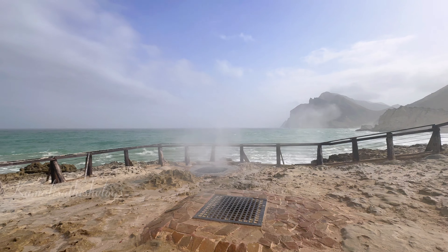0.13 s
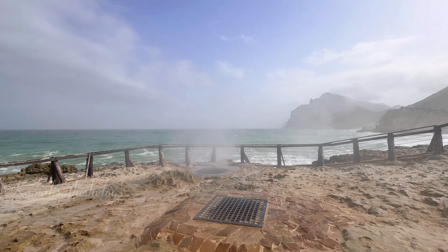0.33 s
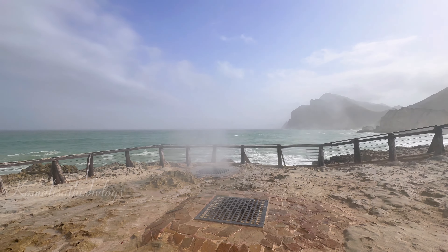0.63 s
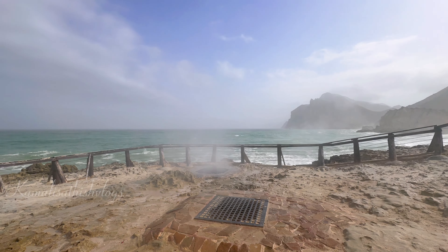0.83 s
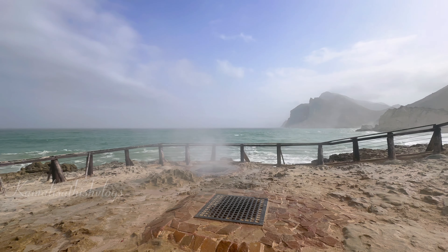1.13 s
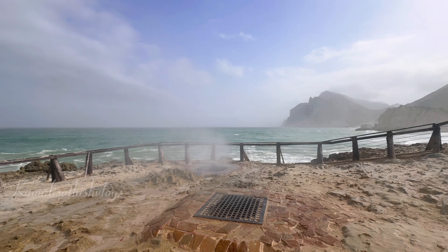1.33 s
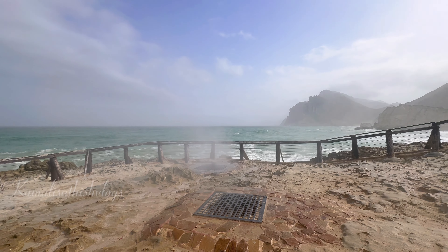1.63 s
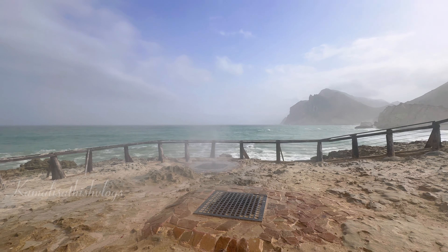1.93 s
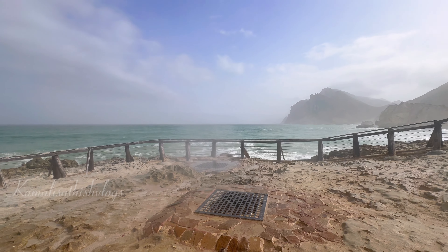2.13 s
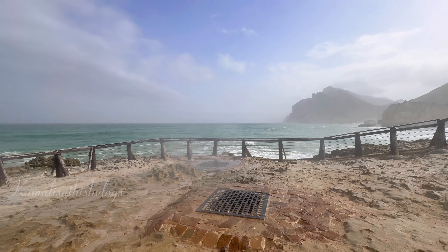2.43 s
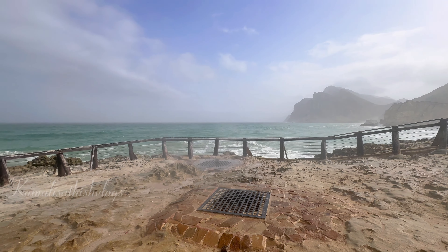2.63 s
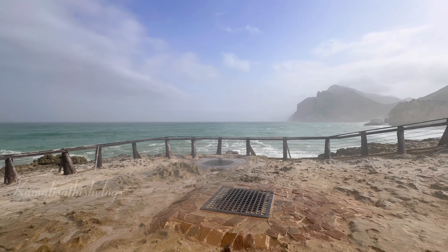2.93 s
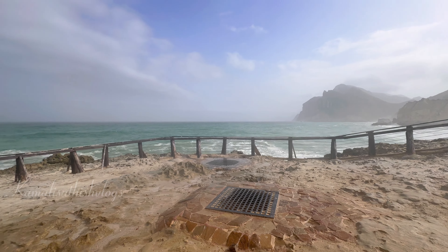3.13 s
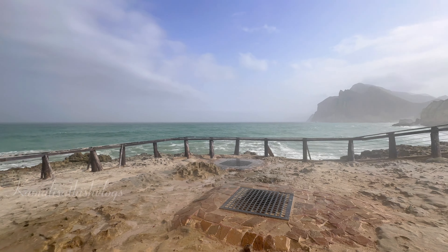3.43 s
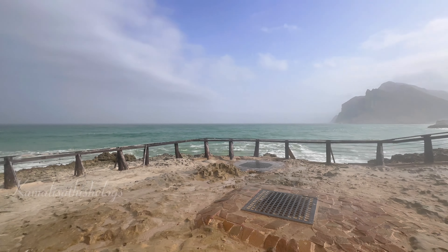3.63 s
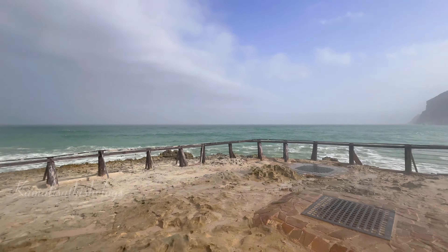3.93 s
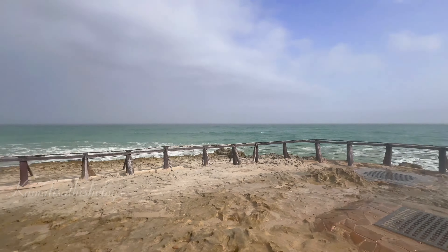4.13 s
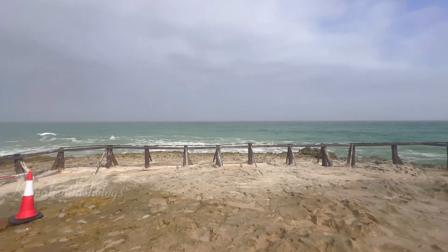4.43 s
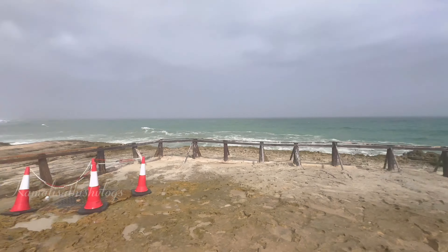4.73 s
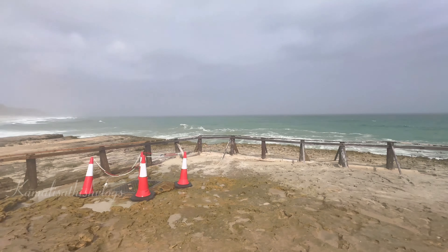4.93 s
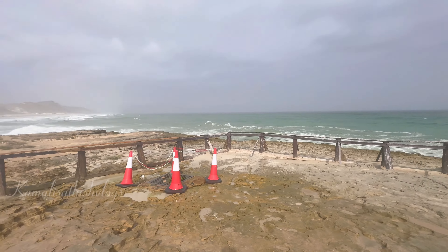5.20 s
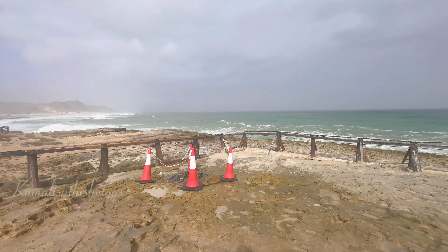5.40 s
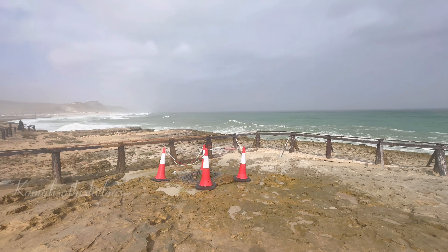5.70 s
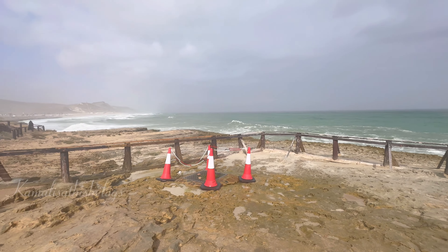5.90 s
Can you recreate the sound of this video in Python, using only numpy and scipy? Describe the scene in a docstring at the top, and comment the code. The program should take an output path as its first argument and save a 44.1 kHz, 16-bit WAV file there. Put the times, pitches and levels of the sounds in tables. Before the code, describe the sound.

Outdoors by a rocky shore, close to a blowhole: a short puff, a brief choked lull, then a roaring, howling blast of air and spray lasting over a second and slightly overloading the microphone. It collapses into a hard watery gulp and uneven hollow puffs, each weaker, while water runs off and surf washes softly with a thin drifting hiss.

```python
"""A swell runs into a sea cave and drives air and spray up through a blowhole in the rock shelf.
The cave roars, the shaft howls and the jet hisses in one long blast that just overloads the microphone.
Weaker, gulping puffs follow as surf washes along the shore, with a narrow, drifting hiss near 6 kHz.
Air, spray and water are filtered noise under level curves; brief narrow noise bands colour them
and the gulps add decaying sines."""
import sys
import numpy as np
from scipy.fft import rfft, irfft, next_fast_len
from scipy.io import wavfile
from scipy.ndimage import uniform_filter1d, map_coordinates

SR = 44100
rng = np.random.default_rng(int(sys.argv[2]) if len(sys.argv) > 2 else 0)


def unload_audio(sound):
    """Save the sound as a 16-bit wav file, at the path given as the first command line argument."""
    columns = np.transpose(np.atleast_2d(sound))
    # keep every value between -1 and 1, then stretch to whole-number steps
    steps = np.round(np.clip(columns, -1, 1) * 32767)
    wavfile.write(sys.argv[1], SR, steps.astype(np.int16))


N = 267201

# Surges of water that push air through the cave. Each row: start of full push [s], hold [s],
# then roar, howl and rumble levels [dB] at that start, before drift and flutter.
SURGE_ROWS = [(0.019, 0.1, -12.5, -20.5, -22), (0.174, .19, -19, -52, -31), (.46, 0.042, -13, -24.5, -30),
              (0.564, 1.138, -9.7, -17.5, -21.5), (1.781, 0.028, -13.5, -24, -44),
              (2.21, 0.04, -18.5, -31.5, -51), (2.362, 0.022, -14, -27, -36), (2.452, 0.076, -12, -21, -49),
              (2.609, 0.039, -12, -24, -52), (2.734, 0.022, -18, -27.5, -53), (2.802, 0.055, -15, -23, -39),
              (2.935, 0.045, -27, -28, -54), (3.049, 0.017, -14, -27, -41), (3.15, 0.038, -19, -29, -53),
              (3.28, 0.065, -28, -35, -59), (3.426, 0.052, -23, -35, -45),
              (3.618, 0.11, -24.5, -39.5, -43.5), (3.947, 0.05, -31, -38.5, -38.5),
              (4.103, 0.14, -28.5, -38.5, -41), (4.723, 0.14, -22, -36, -43.5),
              (4.95, 0.14, -23.5, -38, -50), (5.174, 0.1, -21, -34, -55), (5.34, .02, -30.5, -43, -52),
              (5.478, 0.21, -34, -41, -60)]
PUSH_DB_PER_S, SLACK_DB_PER_S = 177, 141  # build-up and release of a surge at pace 1
SHAFT_PACE = 0.65  # the air in the shaft follows more slowly


def amp(db):
    """Decibels to gain."""
    return 10 ** (np.asarray(db) / 20)


def unit(x):
    """Scale x to rms 1."""
    return x / np.sqrt(np.mean(x ** 2) + 1e-20)


def clock():
    """Time of every sample in seconds."""
    return np.arange(N) / SR


def curves(rows):
    """Interpolate each column after the time to one value per sample."""
    times_s, *columns = np.transpose(rows)
    return [np.interp(clock(), times_s, column) for column in columns]


def ramp(start_s, end_s):
    """Linear rise from 0 to 1 between two times."""
    return np.clip((clock() - start_s) / max(end_s - start_s, 0.01), 0, 1)


def blend(a, b, share):
    """Equal-power mix from a (share 0) to b (share 1)."""
    share = np.clip(share, 0, 1)
    return np.sqrt(1 - share) * a + np.sqrt(share) * b


def wobble(rate_hz):
    """Smooth random curve through rate_hz knots per second."""
    knots = rng.standard_normal(int(N * rate_hz / SR) + 4)
    return map_coordinates(knots, [clock() * rate_hz])


def filtered(x, response):
    """Multiply the spectrum of x by a response of frequency in Hz."""
    size = next_fast_len(N + 8192)
    return irfft(rfft(x, size) * response(np.fft.rfftfreq(size, 1 / SR)), size)[:N]


def rush(spectrum):
    """Turbulence: noise of rms 1, spectrum read on log frequency, with steep outer skirts."""
    f_hz, level_db = np.transpose(spectrum)

    def response(hz):
        gain = amp(np.interp(np.log(hz + 1), np.log(f_hz), level_db))
        skirts = np.minimum(1, np.minimum(hz / f_hz[0], f_hz[-1] / (hz + 1))) ** 6
        return gain * skirts

    return unit(filtered(rng.standard_normal(N), response))


def bell(offset_hz, width_hz):
    """Power response of a resonance with steep sides."""
    return 1 / (1 + (offset_hz / width_hz) ** 2 * 2) ** 2


def ringing(modes):
    """Turbulence of rms 1 coloured by resonances (Hz, width Hz, dB)."""
    def response(hz):
        return np.sqrt(sum(amp(db) ** 2 * bell(hz - centre, width) for centre, width, db in modes))

    return unit(filtered(rng.standard_normal(N), response))


def sustained(x, size):
    """Even out the strength of x over spans of size samples, as under a steady pressure."""
    power = uniform_filter1d(uniform_filter1d(x * x, size), size)
    return x / np.sqrt(np.abs(power) + 1e-9)


def swells(starts, holds, levels_db, rise, fall, drift_db=0, bend=1):
    """Summed gain of pushes that rise, hold and fall (dB/s); drift_db is the change after 1 s of hold."""
    steps_s = clock()[::64]
    t = steps_s - starts[:, None]
    held = np.clip(t, 0, holds[:, None])
    db = levels_db[:, None] + rise * np.minimum(t, 0)
    db = db + drift_db * held ** bend
    db = db - fall * np.maximum(t - holds[:, None], 0)
    return np.interp(clock(), steps_s, np.sqrt(np.sum(amp(db) ** 2, axis=0)))


def surging(levels_db, churn_db, churn_loss_db_per_s, pace=1, drift_db=0, bend=1):
    """Gain of one voice of the cave: surges on top of a churn that weakens steadily."""
    starts, holds, *_ = np.transpose(SURGE_ROWS)
    rise, fall = pace * PUSH_DB_PER_S, pace * SLACK_DB_PER_S
    pushes = swells(starts, holds, levels_db, rise, fall, drift_db, bend)
    churn = amp(churn_db - churn_loss_db_per_s * clock())
    return np.hypot(pushes, churn)


def cave_pressure(sag_db=-3.5):
    """Strength of the air pushed through the cave; it sags during a long surge."""
    _, _, roar_db, _, _ = np.transpose(SURGE_ROWS)
    return surging(roar_db, churn_db=-19.5, churn_loss_db_per_s=2.92, drift_db=sag_db)


def cave(pressure):
    """Cave air roars: broad under the full blast, settling on the chamber's modes as pressure ebbs."""
    # Roar spectra of blast, ebb and last dull swell. Each row: frequency in Hz, relative density in dB.
    blast_roar = [(65, -48), (110, -7), (254, 5), (366, 1.5), (520, -16.5), (680, -59), (1140, -120)]
    ebb_roar = [(65, -66), (110, -24), (176, -6.5), (291, -7), (377, 0), (414, -27), (480, -34.5),
                (620, -11.5), (1060, -120)]
    dull_swell = [(59, -53), (100, -20.5), (167, -11), (189, -3.5), (264, -7), (429, -13), (480, -35),
                  (620, -54), (1060, -120)]
    # Modes of the chamber. Each row: frequency in Hz, width in Hz, relative level in dB.
    chamber_modes = [(188.7, 39, -4.5), (230, 35, -1), (287, 36, 4.5), (349.5, 62, -3)]
    ebb = blend(rush(ebb_roar), ringing(chamber_modes), 0.73)
    roar = blend(rush(blast_roar), ebb, ramp(1.4, 2.23))
    roar = blend(roar, rush(dull_swell), ramp(5.3, 5.6))
    flutter = amp(1.03 * wobble(35))
    return pressure * flutter * sustained(roar, size=2600)


def vent(howl_grows_db=4, rumble_drains_db=-13):
    """Air column rumbles, shaft howls, turns hollow, sinks into shore wash; rising water favours howl."""
    # Resonances of the shaft, then of the half-flooded cave after the blast.
    # Each row: frequency in Hz, width in Hz, relative level in dB.
    shaft_modes = [(428, 69, 2.5), (539, 90, 0), (645, 67, 0.5), (697, 77, -1), (830, 98, -1),
                   (963, 510, -15.5)]
    hollow_modes = [(508, 140, -4), (613, 85, -0.5), (704, 31, -7), (822, 62, -13.5), (950, 360, -22.5)]
    # Spectra of shore wash and air-column rumble. Each row: frequency in Hz, relative density in dB.
    shore_spectrum = [(250, -18), (430, -2), (477, -3), (599, -3.5), (671, -2.5), (740, -9), (859, -4.5),
                      (934, -12), (1010, -7), (1060, -14.5), (1400, -23.5), (1820, -39), (3080, -120)]
    rumble_spectrum = [(20, -31), (40, -20), (72, -2), (110, -1.5), (140, 0), (220, -39)]
    _, _, _, howl_db, rumble_db = np.transpose(SURGE_ROWS)

    howl = blend(ringing(shaft_modes), ringing(hollow_modes), ramp(1.98, 3.23))
    howl = blend(howl, rush(shore_spectrum), ramp(3.35, 3.6))
    howl_gain = surging(howl_db, -33, 1.77, SHAFT_PACE, howl_grows_db)
    howl = howl_gain * amp(0.85 * wobble(25)) * sustained(howl, size=3500)

    rumble_gain = surging(rumble_db, -43.5, 1.5, SHAFT_PACE, rumble_drains_db, bend=2.4)
    rumble = rumble_gain * sustained(rush(rumble_spectrum), size=5000)
    return rumble + howl


def jet(full_flow_db=-22.0, span_db=6):
    """Air tears past the rock lip and shreds water to spray; weak flow is thin, full flow rings the mouth."""
    # Strongest surges, breaking out as a jet. Each row: start of full flow in seconds, hold in seconds,
    # air level in dB, spray level in dB, both before sputter.
    blast_rows = [(0, 0.08, -23, -41), (0.377, 0.055, -33.5, -48), (0.564, 0.12, -24.5, -42),
                  (0.738, 0.95, -19.5, -34.5), (1.784, 0.025, -25.5, -42), (2.22, .14, -42.5, -57),
                  (2.474, 0.072, -29, -54.5)]
    # Resonances of the shaft's mouth. Each row: frequency in Hz, width in Hz, relative level in dB.
    mouth_modes = [(1228, 30, -16.5), (1580, 58, 0), (1764, 6.6, 7), (2140, 94, -14), (2380, 40, 7),
                   (2660, 460, 3), (3020, 24, 7), (3144, 64, 4), (3370, 105, 6.5), (3765, 35, 7.5),
                   (4010, 58, -2.5), (4900, 25, -7)]
    # Spectra of full air, weak air, weak air from the drenched mouth, full spray and thin spray.
    # Each row: frequency in Hz, relative density in dB.
    full_air = [(560, -18), (950, 1.5), (1080, -8), (1220, -1), (1370, -8.5), (1720, -0.5), (1900, -7.5),
                (2340, -6.5), (2850, -8.5), (3540, -3), (5160, -15.5), (6730, -19), (7400, -33),
                (9620, -57), (16300, -120)]
    lull_air = [(560, -36), (950, -15.5), (1170, -5.5), (1270, -8.5), (1780, -3), (1970, -11.5),
                (2620, -1.5), (2880, -7.5), (3600, -1), (4650, -17.5), (5340, -22), (6510, -19.5),
                (7400, -25.5), (9620, -57), (16300, -120)]
    puff_air = [(560, -44), (950, 2), (1080, -3), (1210, -1.5), (1360, -13), (1550, 2.5), (1820, -9),
                (1990, 0), (2110, -4.5), (3240, -10), (3600, -0.5), (4380, -23), (6390, -18), (7400, -32),
                (9620, -59), (16300, -120)]
    full_spray = [(4000, -37), (6000, -1.5), (6800, 4), (7500, -6.5), (8400, -0.5), (9300, -2.5),
                  (10300, -6.5), (11700, -7.5), (13500, -16), (15700, -22.5)]
    thin_spray = [(5800, -5), (6600, 8), (7600, -25), (8400, -4), (9200, 0), (10300, -12), (12300, -14.5),
                  (15700, -25)]

    starts, holds, air_db, spray_db = np.transpose(blast_rows)
    air = swells(starts, holds, air_db, rise=74, fall=115)
    spray = swells(starts, holds, spray_db, rise=75, fall=120)
    choked = ramp(0.1, 0.25) - ramp(0.5, 0.8)  # between blasts only a slit stays open
    flow = 1.5 + (20 * np.log10(air) - full_flow_db) / span_db
    flow = np.minimum(flow, 1 - choked)

    full = blend(rush(full_air), ringing(mouth_modes), 0.33)
    weak = blend(rush(lull_air), rush(puff_air), ramp(2.19, 2.44))  # the drenched mouth sounds darker
    mist = blend(rush(full_spray), amp(1.5) * rush(thin_spray), choked)
    mist = amp(0.5 * wobble(400)) * mist
    sputter = amp(0.86 * wobble(18) + 0.27 * wobble(140))
    return (air * blend(weak, full, flow) + spray * mist) * sputter


def reflected(x, strength):
    """Add a close reflection: hollow notches slide with its delay."""
    # Close surface reflecting into the microphone, turning. Each row: time in seconds, delay in seconds.
    mirror_rows = [(2.4, .00032), (2.85, .00035), (3.15, .000397), (3.7, .000382), (4.15, .00031),
                   (4.6, .000365), (5.5, .00033)]
    delay_s, = curves(mirror_rows)
    echo = map_coordinates(x, [(clock() - delay_s) * SR])
    return unit(x + strength * echo)


def surf(masked_db=-7.0, wash_gain_db=1, foam_gain_db=7.5):
    """Fallen spray runs back over the shelf, giving way to shore wash; foam fizzes on top."""
    # Water washing over the rocks. Each row: time in seconds, wash level in dB, foam level in dB,
    # both before the gains above.
    wash_rows = [(2.75, -42.5, -60), (2.82, -40, -59), (3.14, -43.5, -67), (3.8, -44.5, -66.5),
                 (3.86, -49, -70), (3.97, -44, -64.5), (4.32, -48, -66.5), (4.42, -50.5, -71),
                 (4.56, -53, -71), (4.71, -45.5, -68), (5.14, -47, -66), (5.5, -49.5, -65.5),
                 (5.85, -54.5, -72.5), (6.06, -57.5, -77)]
    # Spectra of runoff, shore water and foam. Each row: frequency in Hz, relative density in dB.
    runoff_spectrum = [(650, -30), (1100, -10.5), (1250, -3), (1380, -6), (1800, 2.5), (2140, 5.5),
                       (2410, -1), (2670, 4), (3130, -5), (3570, -0.5), (4320, -10.5), (5300, -10.5),
                       (6890, -43), (11700, -120)]
    water_spectrum = [(680, -29), (1150, 0), (1370, -25), (1500, -5.5), (1600, -9.5), (2110, -5),
                      (2920, -5), (3200, -10.5), (3320, -4.5), (3570, -18.5), (4330, -18), (5090, -22),
                      (5400, -20), (7020, -49), (11900, -120)]
    foam_spectrum = [(2940, -38), (5000, -6), (5100, -19), (5420, -6.5), (5820, -4), (6670, -1.5),
                     (9930, -11), (13500, -20), (14600, -30), (15500, -48.5)]

    wash_db, foam_db = curves(wash_rows)
    water = blend(rush(runoff_spectrum), rush(water_spectrum), ramp(2.6, 5.0))
    lapping_db = 0.72 * wobble(30) + 0.29 * wobble(170)
    wash = amp(wash_db + wash_gain_db + lapping_db) * water
    fizz = reflected(rush(foam_spectrum), strength=0.33)
    foam = amp(foam_db + foam_gain_db + 0.8 * wobble(300)) * fizz
    wet = ramp(2.2, 2.75)
    return (wash + foam) * amp(masked_db * (1 - wet))


def narrow_bands():
    """Narrow noise bands under Gaussian envelopes: reflection-coloured hiss peaks above, bubbling below."""
    # Brief hiss peaks and bubbling low tones. Each row: centre in seconds, Gaussian sigma in seconds,
    # frequency in Hz, width in Hz, peak rms level in dB.
    band_rows = [(.52, .13, 6500, 450, -49), (2.51, 0.078, 3600, 300, -47), (2.55, 0.084, 6340, 650, -44),
                 (2.62, 0.08, 5500, 250, -48.5), (2.89, 0.095, 5670, 480, -44), (3.3, .15, 596, 80, -39),
                 (3.68, .09, 5600, 300, -61), (3.72, .12, 857, 90, -39), (4.0, 0.1, 590, 90, -35),
                 (4.16, .07, 7400, 550, -62), (4.22, 0.11, 315, 30, -29.5), (4.26, 0.087, 853, 55, -42.5),
                 (4.8, .08, 5940, 400, -56), (5.1, 0.58, 4300, 330, -60), (5.18, 0.22, 920, 170, -40.5),
                 (5.225, 0.08, 3190, 150, -43), (5.24, .08, 2550, 200, -50), (5.35, 0.5, 3180, 150, -58.5),
                 (5.535, .05, 6300, 506, -61)]
    out = np.zeros(N)
    for centre_s, sigma_s, hz, width_hz, db in band_rows:
        envelope = np.exp(-0.5 * ((clock() - centre_s) / sigma_s) ** 2)
        out += amp(db) * envelope * ringing([(hz, width_hz, 0)])
    return out


def reflected_hiss(pressure, width_hz=480, level_db=-46, follows=0.66):
    """Narrow hiss near 6 kHz, coloured by a close reflection; pitch drifts, level follows the surges."""
    # Drifting pitch of the hiss band. Each row: time in seconds, centre frequency in Hz.
    pitch_rows = [(2.4, 6115), (3.04, 5460), (3.7, 5630), (4.02, 6080), (4.12, 6810), (4.47, 5820),
                  (5.49, 5890), (5.52, 6460), (6.06, 6000)]
    centre_hz, = curves(pitch_rows)
    band = unit(filtered(rng.standard_normal(N), lambda hz: bell(hz, width_hz)))
    carrier = np.cos(2 * np.pi * np.cumsum(centre_hz) / SR)  # shifts the low band up to the pitch
    return amp(level_db) * pressure ** follows * ramp(2.4, 3.0) * unit(band * carrier)


def gulps(cave_hz=298, ring_t60_s=0.039, splat_t60_s=0.018, attack_s=0.01, ring_db=-9, splat_db=-20):
    """Each slap of water gives a muffled splat and rings the cave's main mode for a moment."""
    # Water slapping shut a pocket of the cave. Each row: start in seconds, relative strength in dB.
    gulp_rows = [(2.504, 21), (2.614, -4), (2.647, -4), (2.814, -4), (3.054, -4), (5.173, -14),
                 (5.254, -17)]
    out, t = np.zeros(N + SR), np.arange(SR // 4) / SR
    splats = rush([(300, 4), (800, -7), (1400, -23.5)])
    attack = (1 - np.exp(-t / attack_s)) ** 2
    for start_s, db in gulp_rows:
        start = round(start_s * SR)
        hz = cave_hz * np.exp(0.034 * rng.standard_normal())
        ring = amp(ring_db - 60 * t / ring_t60_s) * np.sin(2 * np.pi * hz * t)
        splat = amp(splat_db - 60 * t / splat_t60_s) * splats[start:][:len(t)]
        out[start:][:len(t)] += amp(db) * attack * (ring + splat)
    return out[:N]


def scene():
    """The blowhole in front of the shore, one channel."""
    pressure = cave_pressure()
    blowhole = cave(pressure) + vent() + jet()
    return (blowhole + surf() + narrow_bands() + reflected_hiss(pressure) + gulps())[None]


def record(dry, top_hz=15700):
    """Round off the highest peaks at full scale; pass nothing above the band limit."""
    rounded = dry[0] / (1 + np.abs(dry[0]) ** 8) ** (1 / 8)
    return filtered(rounded, lambda hz: hz < top_hz)[None]


dry = scene()
out = record(dry)
unload_audio(out)
```